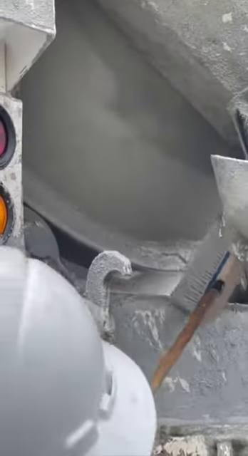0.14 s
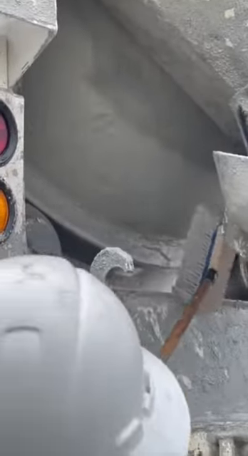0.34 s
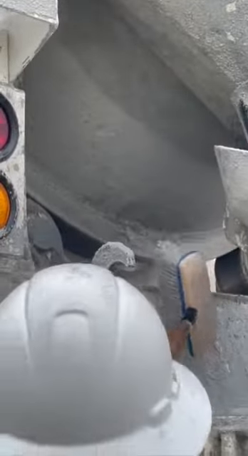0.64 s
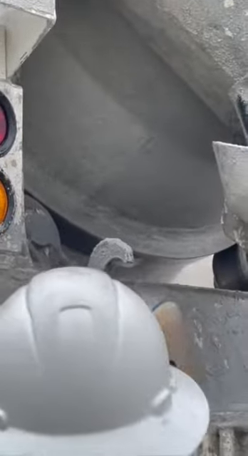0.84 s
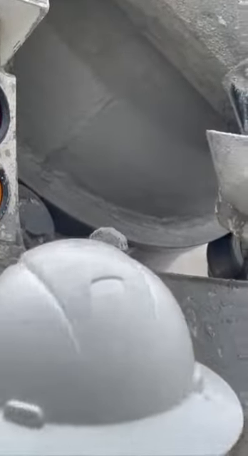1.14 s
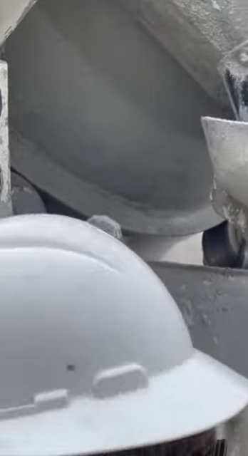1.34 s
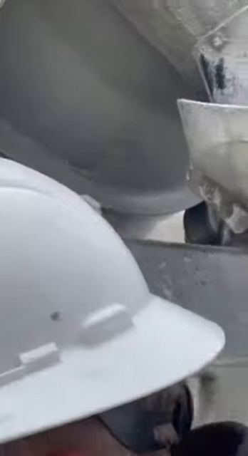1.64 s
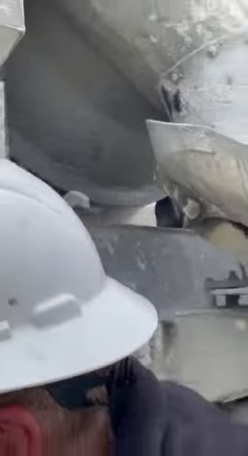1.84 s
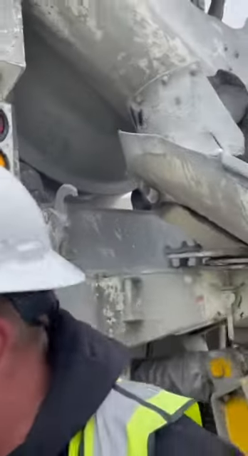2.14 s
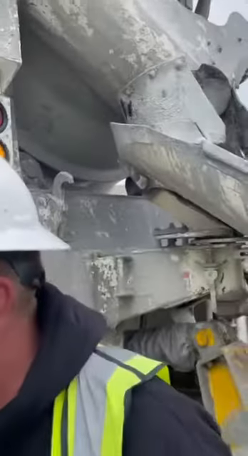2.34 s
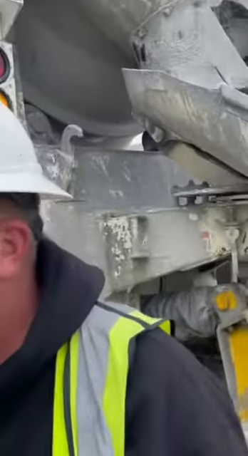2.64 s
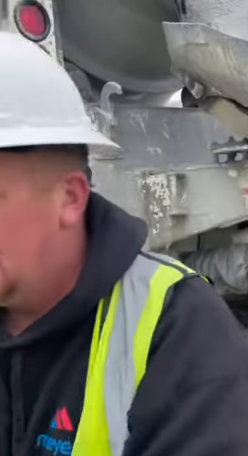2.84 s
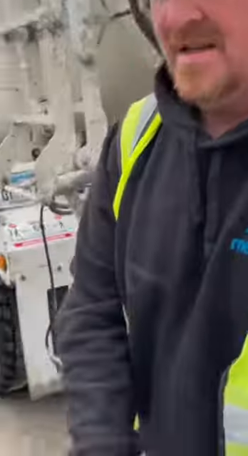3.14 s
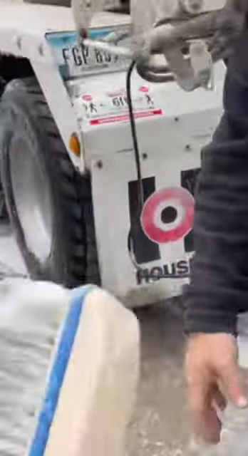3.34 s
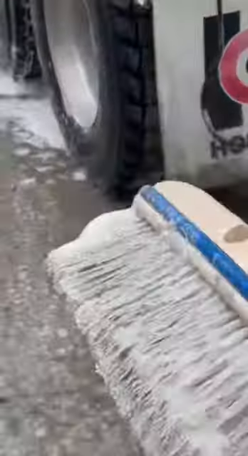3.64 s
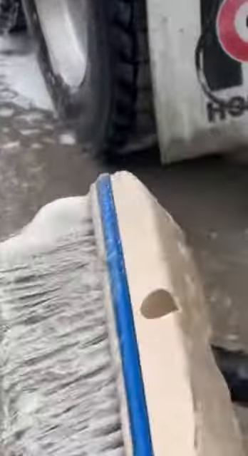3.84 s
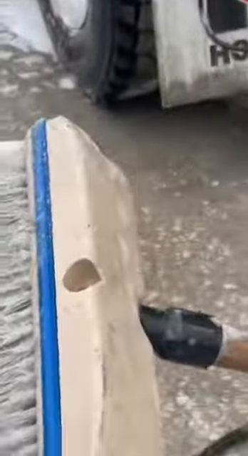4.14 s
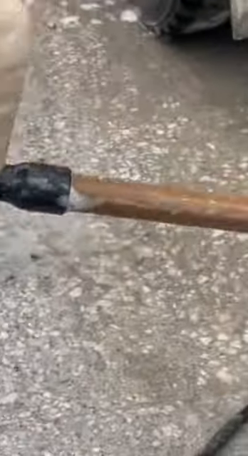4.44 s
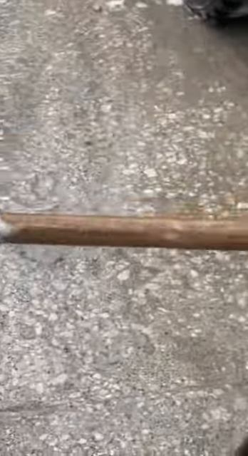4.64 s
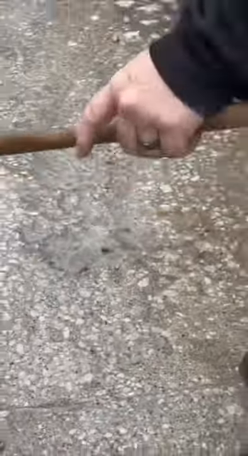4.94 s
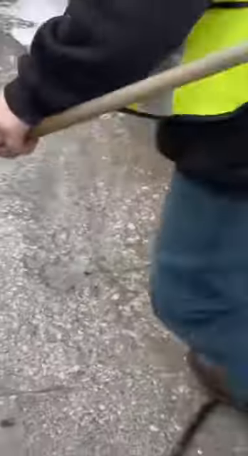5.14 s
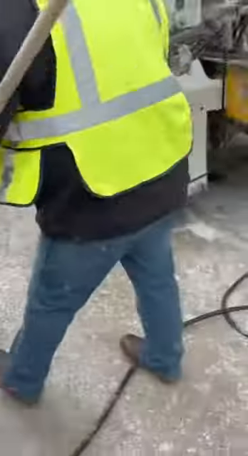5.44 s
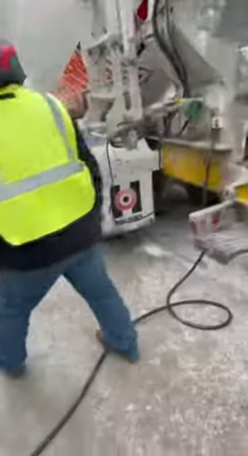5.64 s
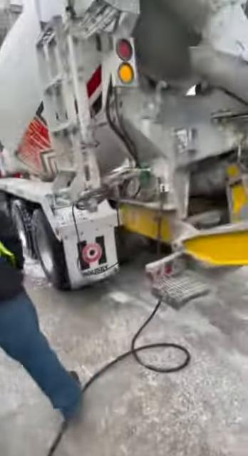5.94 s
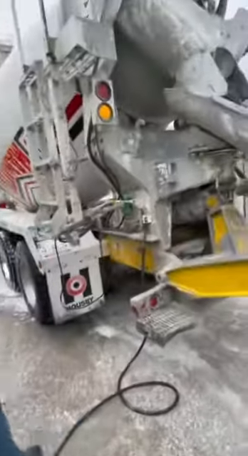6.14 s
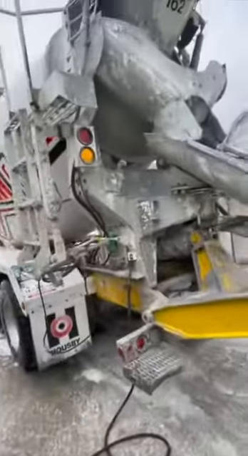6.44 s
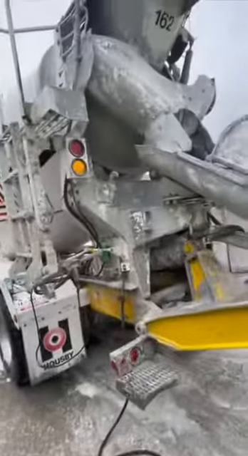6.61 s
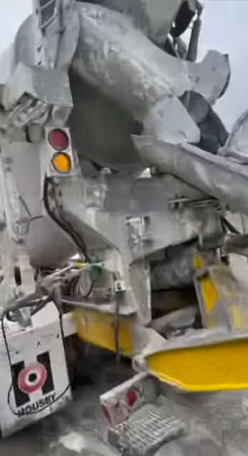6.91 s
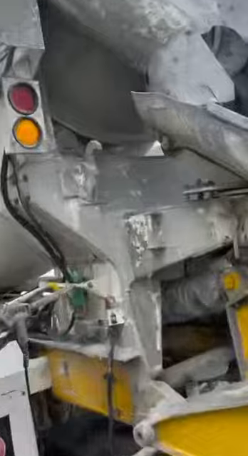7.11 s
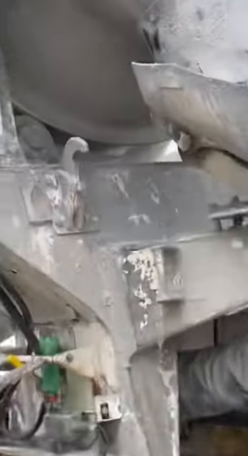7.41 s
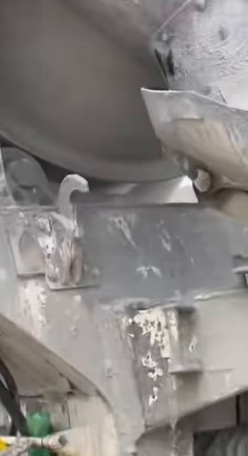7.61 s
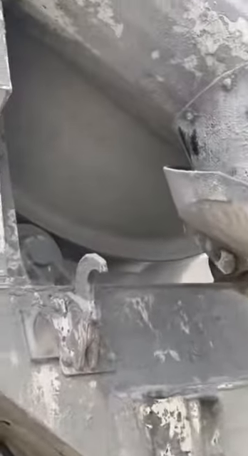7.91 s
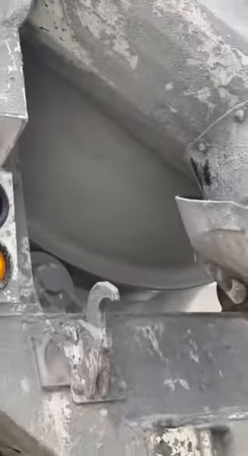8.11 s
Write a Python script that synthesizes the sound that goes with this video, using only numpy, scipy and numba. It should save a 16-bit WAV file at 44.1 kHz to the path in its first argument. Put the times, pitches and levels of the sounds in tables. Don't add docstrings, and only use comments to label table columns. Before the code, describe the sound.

Continuous deep diesel idling fills the scene, throbbing unevenly under tumbling drum thuds, wavering mid-pitched hydraulic whine and broad fan-like rush. Early on, a broom handle knocks dully; later, short gritty footsteps drag close to the handheld phone, with sharp stone clicks. Past the middle the stereo image opens wider, one exhaust briefly weakens, and hard scrapes return near the end.

```python
import sys
import numpy as np
from scipy import signal
from scipy.fft import rfft, irfft, next_fast_len
from scipy.io import wavfile
from scipy.ndimage import uniform_filter1d
from numba import njit

SR = 44100
rng = np.random.default_rng(int(sys.argv[2]) if len(sys.argv) > 2 else 0)


def int16_out(signal):
    q = np.round(np.clip(np.atleast_2d(signal).T, -1, 1) * 32767)
    wavfile.write(sys.argv[1], SR, q.astype(np.int16))


def linear_from_db(decibels):
    return 10 ** (np.asarray(decibels, float) / 20)


N = 364707
T = np.arange(N) / SR


@njit
def svf(x, hz, width):
    y, b, l = np.empty(len(x)), 0., 0.
    g, k = np.tan(np.pi * hz / SR), width / hz
    for i in range(len(x)):
        v = (b + g * (x[i] - l)) / (1 + g * (g + k))
        b, l, y[i] = 2 * v - b, l + 2 * g * v, k * v
    return y


def unit(x):
    return x / np.sqrt(np.mean(x ** 2))


def curves(table):
    s, *columns = np.transpose(table)
    return [np.interp(T, s, c) for c in columns]


def walk(rate_hz):
    step = 32
    hold = int(SR / rate_hz / step)
    levels = np.repeat(rng.standard_normal(N // step // hold + 2), hold)
    coarse = uniform_filter1d(uniform_filter1d(levels, hold), hold)
    return 1.29 * np.interp(np.arange(N) / step, np.arange(len(coarse)), coarse)


def tone(turns, db, hz, pan_db):
    spread = min(.12 + hz / 800, 1)
    ear = np.array([[1], [-1]])
    lean_db = np.exp(-np.log2(hz / 520) ** 2 / 0.64) * pan_db / 2 + spread * 1.1 * walk(1.96)
    phase = 2 * np.pi * turns + ear * spread * 0.12 * walk(1.3)
    return np.sqrt(2) * linear_from_db(db + ear * lean_db) * np.cos(phase)


def orders(turns, hz, table, pan_db, fade_db, rate_hz):
    return sum(tone(k * turns + rng.random(), db + fade_db * walk(rate_hz), k * hz, pan_db)
               for k, db in table)


def swells(table, which, steady_db):
    total = linear_from_db(steady_db)
    for s, length_s, line, db in table:
        if abs(line / which - 1) < .08:
            total = total + linear_from_db(db) * np.cos(np.pi * np.clip((T - s) / length_s, -.5, .5)) ** 2
    return 20 * np.log10(total + np.zeros(N))


def strong(turns, hz, steady, table, pan_db, flutter_db, rate_hz, slop=0):
    out = 0
    for k, steady_db in steady:
        k = round(k)
        phase = k * turns + rng.random() + slop * k ** 2 * walk(rate_hz)
        db = swells(table, k, steady_db) + flutter_db * np.sqrt(k) * walk(rate_hz)
        out = out + tone(phase, db, k * hz, pan_db)
    return out


TRUCK_HZ, OTHER_HZ, BEAT_S = 34.98, 32.945, .074
# (time [s], truck 2nd order [dB], other 2nd order [dB])
EXHAUST = [(0, -27, -30.5), (.75, -27.5, -31), (1.35, -27.5, -29), (1.7, -25.5, -29), (2.7, -27, -29.5),
           (3.2, -24.5, -27.5), (4.3, -25, -26), (5.8, -25, -28), (6.3, -28, -30), (6.75, -29, -38),
           (7.3, -27.5, -35), (8.27, -26.5, -30)]
# (firing multiple [1], level [dB])
TRUCK_ORDERS = [(1, -40), (4, -46.5), (6, -52), (10, -51.5)]
# (firing multiple [1], level [dB])
OTHER_ORDERS = [(1.5, -46), (3, -40), (3.5, -43), (4, -43), (4.5, -44), (6, -55.5), (6.5, -51.5), (11, -43),
                (12, -54.5), (12.5, -47.5), (13.5, -58), (14, -55.5), (22, -57)]
# (firing multiple [1], level [dB])
TRUCK_STEADY = [(3, -42.5), (5, -42.5)]
# (time [s], length [s], firing multiple [1], level [dB])
TRUCK_SWELLS = [(2.64, 1.2, 3, -40), (3.36, 1.06, 5, -36), (3.44, 2.6, 3, -40), (5.12, 2.4, 3, -37),
                (5.475, 2.8, 5, -36.5), (6.96, 1, 5, -41)]


def exhausts(hunt_s, pan_db):
    truck, other = TRUCK_HZ * (T - BEAT_S), OTHER_HZ * (T - BEAT_S)
    truck_db, other_db = curves(EXHAUST)
    out = tone(2 * truck, truck_db, 70, pan_db) + tone(2 * other, other_db, 66, pan_db)
    out += strong(truck, TRUCK_HZ, TRUCK_STEADY, TRUCK_SWELLS, pan_db, 0.87, 4)
    out += orders(truck + TRUCK_HZ * hunt_s, TRUCK_HZ, TRUCK_ORDERS, pan_db, 1.9, 2.59)
    return out + orders(other, OTHER_HZ, OTHER_ORDERS, pan_db, 4.6, 2.996)


# (pitch [Hz], width [Hz])
DRUM_MODES = [(78, 8), (93, 10.7), (124, 23)]
# (time [s], length [s], mode [Hz], level [dB])
LUMPS = [(.7, 1.4, 78, -33), (1.9, 1.4, 78, -34.5), (0.16, 0.56, 93, -27), (0.24, 0.18, 124, -30),
         (0.52, 0.48, 93, -18.5), (0.96, 0.64, 93, -25.6), (1.32, 0.33, 93, -30), (1.8, 0.69, 93, -33),
         (2.12, 0.28, 93, -25), (2.2, 0.45, 124, -44), (2.28, 0.3, 93, -34), (2.4, 0.17, 124, -23.5),
         (2.76, 0.47, 124, -26.5), (2.88, 0.22, 93, -29.5), (3.16, 0.18, 93, -31), (3.6, 0.17, 124, -26.5),
         (4.28, 0.15, 93, -31.9), (4.44, 0.13, 124, -30.5), (6.48, 0.27, 124, -35), (6.52, 0.22, 93, -25),
         (6.68, 0.43, 124, -27), (6.84, 0.22, 93, -30), (7.04, 0.21, 93, -24), (7.24, 0.19, 93, -24),
         (7.48, 0.18, 93, -29), (7.64, 0.39, 124, -33), (7.72, 0.2, 93, -33), (8.04, 0.3, 93, -28.5)]


def drum():
    out = 0
    for hz, width_hz in DRUM_MODES:
        shake = np.sqrt(2) * np.cos(2 * np.pi * (hz * T + .12 * walk(width_hz)))
        out = out + linear_from_db(swells(LUMPS, hz, -36) + 1.5 * walk(20)) * shake
    return out


PUMP_HZ, GEAR_HZ, FAN_HZ = 126.17, 173.0, 4877
# (order [1], level [dB])
PUMP_ORDERS = [(1, -38.5), (10, -54), (11, -55), (12, -62)]
# (order [1], level [dB])
PUMP_STEADY = [(2, -41), (3, -47.5), (4, -49.5), (5, -49.5), (6, -48.5), (7, -62), (8, -55.5), (9, -56)]
# (time [s], length [s], order [1], level [dB])
PUMP_SWELLS = [(0.358, 2, 5, -45.5), (.4, 0.52, 2, -31.5), (.7, 2.75, 6, -39), (2.04, 1.8, 6, -41),
               (2.7, 1.1, 4, -53), (3, 1.11, 2, -34.5), (3.003, 0.91, 6, -44.5), (3.196, 1.7, 3, -45),
               (3.68, 0.83, 6, -42.5), (3.836, 2.1, 5, -47.5), (4.036, .43, 3, -36), (4.044, 2.3, 3, -38.5),
               (4.498, 1.75, 6, -44.5), (4.8, 1.6, 5, -52), (5.157, 1.6, 3, -42.5), (5.4, 0.97, 6, -38.5),
               (5.394, 1.98, 2, -32), (5.717, 0.47, 5, -43), (5.85, 1.9, 4, -44), (6.164, 0.28, 6, -41),
               (6.162, 2.16, 3, -38.5), (6.32, 1.25, 2, -36), (6.96, 0.89, 2, -29.5), (7, 0.69, 5, -40),
               (7.045, 0.45, 3, -42.5), (7.107, 1.85, 6, -38.5), (7.6, 0.28, 3, -41),
               (7.957, 1.6, 2, -36.5), (7.96, 2, 3, -37.5), (8, 0.91, 6, -55),
               (2.2, .7, 7, -56), (3.5, 1.1, 7, -46.5), (4.2, 1.2, 7, -50), (5.95, 1.3, 7, -47.5),
                    (7.1, 1, 7, -54), (1, .5, 8, -51), (3, 1.6, 8, -53), (4.7, 1.2, 8, -50),
                    (5.7, .9, 8, -43.5), (7.5, 2, 8, -47), (.9, 1.9, 9, -48.5), (2.3, 0.78, 9, -54),
                    (3.9, 2.2, 9, -50), (5, 1, 9, -52), (6, 1, 9, -46), (7.7, 2.2, 9, -48)]
# (order [1], level [dB])
GEAR_ORDERS = [(2, -48), (3, -49.5), (4, -64.5), (8, -61.5)]
# (order [1], level [dB])
GEAR_FAINT = [(20, -64), (20.5, -64), (30, -68)]
# (order [1], level [dB])
GEAR_STEADY = [(6, -48), (12, -59.5)]
# (time [s], length [s], order [1], level [dB])
GEAR_SWELLS = [(.5, .5, 6, -44.5), (.4, .9, 12, -52), (1.08, .4, 6, -43), (1.05, 1.0, 12, -49),
               (2.05, 1.0, 6, -47), (1.95, .5, 12, -55), (3.13, .6, 12, -48.5), (3.6, 1.2, 6, -43),
               (4.5, 2.1, 6, -39.5), (5.452, 0.74, 6, -41), (5.2, .6, 12, -60), (6.3, .45, 12, -52),
               (6.8, 0.97, 12, -56), (7.6, 1.1, 6, -43.5), (8.1, .8, 6, -46), (8.1, .6, 12, -57)]
# (time [s], length [s], order [1], level [dB])
FAN_SWELLS = [(.1, .3, 1, -63), (.5, .4, 1, -60.5), (.95, .5, 1, -61), (1.4, .6, 1, -57.5),
              (1.75, .5, 1, -60.5), (2.58, .5, 1, -57.5)]


def whines(hunt_s, pan_db):
    pump, gear = PUMP_HZ * (T + hunt_s), GEAR_HZ * (T + hunt_s)
    out = orders(pump, PUMP_HZ, PUMP_ORDERS, pan_db, 3.3, 3.8)
    out += orders(gear, GEAR_HZ, GEAR_ORDERS, pan_db, 3.2, 3.5)
    out += orders(gear, GEAR_HZ, GEAR_FAINT, 0, 4, 3)
    out += strong(pump, PUMP_HZ, PUMP_STEADY, PUMP_SWELLS, pan_db, .45, 12)
    out += strong(gear, GEAR_HZ, GEAR_STEADY, GEAR_SWELLS, pan_db, .65, 16, slop=.0016)
    fan_db = swells(FAN_SWELLS, 1, -74) + 2.6 * walk(16)
    return out + tone(FAN_HZ * T + .17 * walk(30), fan_db, FAN_HZ, 0)


# (time [s], length [s], level [dB], sole [Hz], top [Hz])
SCUFFS = [(1.827, 0.06, -37.5, 1690, 7400), (3.277, .04, -43.5, 2200, 11000),
          (3.613, .045, -36, 4600, 7000), (3.63, 0.055, -32, 2400, 4500), (4.509, 0.089, -48, 2300, 3500),
          (5, 0.059, -45.5, 2800, 4400), (5.543, .03, -42, 2100, 8000), (6.975, 0.038, -41, 2700, 3570),
          (7.4, .032, -42, 2670, 6000), (7.45, 0.095, -42, 2270, 4000), (7.48, 0.053, -46, 2300, 9000),
          (7.563, 0.05, -39.5, 4260, 6000), (7.596, 0.063, -40, 4200, 6700),
          (7.618, 0.081, -33.5, 2710, 7000), (8.251, 0.095, -32, 1950, 6540), (2.736, .19, -45, 1650, 2000),
          (2.93, .19, -47, 1800, 2200), (3.13, .19, -45, 1700, 2100), (3.329, 0.18, -46, 1640, 2000),
          (4.55, .06, -52, 2400, 3000)]
# (time [s], length [s], level [dB], sole [Hz])
BRUSHES = [(0.185, .038, -56.5, 8000), (1.108, 0.022, -49, 5500), (1.194, 0.024, -44, 4300),
           (2.146, 0.027, -54, 9000), (2.294, 0.078, -55.5, 8600), (3.576, 0.037, -38.5, 3720),
           (4.15, 0.052, -56, 7000), (4.219, 0.082, -45, 7940), (4.898, .022, -42, 5200),
           (6.553, .053, -48, 5760), (6.703, .04, -46.5, 3200), (6.972, 0.06, -41.5, 5430),
           (7.263, 0.029, -56.5, 7960)]
BRUSH_TOP_HZ, GRIT_BELOW_SOLE = 11500, .66


def drag(length_s, sole_hz, top_hz):
    count = int(1.3 * length_s * SR)
    u = np.arange(count) / (1.3 * length_s * SR)
    noise, grit, slip, luck = rng.standard_normal((4, SR // 4))
    noise = noise * (1 + 4 * (luck > 2.7))
    rough_db = 2.0 * np.repeat(grit, 55)[:SR // 4] + 1.4 * np.repeat(slip, 250)[:SR // 4]
    grains = (noise * linear_from_db(rough_db))[:count]
    edges_hz = [GRIT_BELOW_SOLE * sole_hz, max(top_hz, 1.2 * sole_hz)]
    hiss = signal.sosfilt(signal.butter(2, edges_hz, "band", fs=SR, output="sos"), grains)
    for multiple, gain in [(1, 1.6), (1.4, .8), (2.0, .6)]:
        hz = min(multiple * sole_hz, 15000.)
        hiss = hiss + gain * svf(svf(grains, hz, .42 * hz), hz, .42 * hz)
    return unit(hiss) * 2.07 * u ** 0.69 * (1 - u) ** 1.58 * 2.21


# (time [s], peak [dB], pitch [Hz], t60 [s])
TICKS = [(3.177, -31, 11400, 0.0037), (3.272, -28, 5000, 0.0066), (4.348, -25.5, 2820, 0.019),
         (4.348, -31.5, 4400, 0.011), (4.349, -29.5, 5440, .012), (1.8487, -26, 3100, 0.016),
         (3.582, -27.5, 3300, .008), (6.981, -31.5, 2900, 0.018), (5.655, -41, 10000, 0.0034),
         (5.951, -37, 9500, 0.0044), (6.104, -31, 2800, .017), (6.540, -35, 10000, 0.005),
         (7.564, -21, 2900, .005), (1.854, -27.5, 2100, 0.017), (8.252, -28.5, 1800, 0.023),
         (8.9, -27, 4200, .005), (8.066, -43.5, 12000, 0.0036), (.886, -14, 700, .016),
         (.8965, -17, 560, .02), (.904, -17.5, 740, .028), (3.112, -32.5, 1740, 0.12),
         (4.902, -37, 12700, .004), (6.96, -36, 13000, 0.0036), (1.841, -42, 13000, .004),
         (3.586, -31, 5630, .012), (3.591, -30.5, 3900, 0.013), (3.6265, -26, 4870, .016),
          (3.637, -25, 3100, .012), (3.648, -24, 2080, .02), (3.664, -26, 2200, .016),
          (6.559, -36.5, 5300, .03), (6.578, -35.5, 5680, .03), (6.592, -38.5, 5400, .03),
          (6.98, -29.5, 5140, .025), (6.994, -33, 5600, .025), (7.006, -33, 5900, .025),
          (6.998, -39.5, 10600, .012), (7.5642, -23, 4600, 0.0043), (7.5686, -24, 2400, 0.0066),
          (7.575, -28, 4900, .01), (7.591, -28, 4300, .01), (7.621, -28, 4000, .008),
          (7.6336, -23, 5640, .008), (7.641, -28, 2100, .014), (7.646, -28, 5300, .008),
          (7.6345, -25, 2800, .012), (3.281, -31, 2600, .014), (4.903, -33, 2600, .012),
          (5.552, -31, 2500, .014), (6.575, -35, 2600, .015), (1.204, -36, 2600, .01),
          (7.5685, -21, 5150, .008), (7.5688, -27, 3700, .005), (1.21, -38, 3400, .01),
          (7.656, -27, 3200, .01), (7.665, -24, 4280, .008), (7.677, -27, 5200, 0.011)]


def tick(hz, t60_s):
    u = np.arange(int(t60_s * SR)) / SR
    rough = svf(rng.standard_normal(SR // 8), 1. * hz, 0.51 * hz)[:len(u)]
    ring = np.sin(2 * np.pi * hz * u) + 1.2 * rough
    return ring * np.exp(-np.log(1000) * u / t60_s) * np.minimum(u * hz / 0.53, 1)


def boots():
    out = np.zeros(N + SR)
    for s, length_s, db, sole_hz, top_hz in [*[(*row, BRUSH_TOP_HZ) for row in BRUSHES], *SCUFFS]:
        hiss = drag(length_s, sole_hz, top_hz)
        out[int(s * SR):][:len(hiss)] += linear_from_db(db) * hiss
    for s, db, hz, t60_s in TICKS:
        ring = tick(hz, t60_s)
        out[int(s * SR):][:len(ring)] += linear_from_db(db) * ring
    out = out[:N]
    late = uniform_filter1d(np.roll(out, 37), 7)
    return np.array([out + 0.28 * late, out - 0.47 * late])


# (pitch [Hz], density [dB/Hz], side minus mid [dB])
ROAR = [(25, -21.5, -31), (48.7, -20.5, -24), (73, -4.5, -29), (160, -10.5, -21.5), (300, -17.5, -15.5),
        (619, -21, -11), (1100, -29, -8), (1540, -34, -19.5), (2313, -34.5, -5.5), (4200, -45.5, -11),
        (6000, -45.5, -14), (9000, -57, -45), (12700, -50, -43.5), (16700, -81.5, -35)]
ROAR_DB, WIDE_TOP_HZ = -26.5, 5900
BASS_WIDE, SHADE = 0.72, .15


def roar(roar_db, pan_db, wide_db):
    hz_points, db_points, side_points = np.transpose(ROAR)
    out, clatter = 0, np.cos(2 * np.pi * TRUCK_HZ * T) + .5 * walk(60)
    for hz in 25 * 2 ** np.arange(0, 9.4, 1 / 3):
        mid, side = (svf(svf(rng.standard_normal(N), hz, hz / 3), hz, hz / 3) for _ in range(2))
        db, side_db = (np.interp(np.log(hz), np.log(hz_points), p) for p in (db_points, side_points))
        up = np.clip(np.log2(hz / 200) / 3, 0, 1)
        db = db + up * (roar_db + min(2.0, 4000 / hz) * walk(1.0))
        db = db - SHADE * wide_db * np.clip(np.log2(hz / 2000), 0, 1)
        db = db + 0.71 * walk(6) + 0.51 * up * clatter
        lean_db = np.exp(-np.log2(hz / 600) ** 2 / 0.58) * pan_db / 2
        side_db = side_db + max(up, BASS_WIDE) * wide_db / (1 + (hz / WIDE_TOP_HZ) ** 10)
        ports = mid + linear_from_db(side_db) * np.array([side, -side])
        out = out + linear_from_db(db + np.array([lean_db, -lean_db])) * ports
    return unit(out) * linear_from_db(ROAR_DB)


def shadow(x, wide_db):
    from_db, full_db = 4, 12
    band = svf(x.mean(axis=0), 4600., 320.)
    band = np.clip((wide_db - from_db) / (full_db - from_db), 0, 1) * band
    return x - np.array([0 * band, 2 * band])


# (time [s], roar [dB], left minus right [dB], extra side [dB])
AIM = [(0, 0, -0.5, -4), (.9, -0.5, -2, -3), (2.1, -1, -2.5, 3), (3.35, -1, -1.5, 2), (3.9, 0, -2, -2),
       (5.5, -1.5, -4.5, -3), (5.65, -.5, -5, 8.5), (6.3, -1, -4, 9), (6.95, -1, -8, 11),
       (7.3, -0.5, -6, 1), (8.27, -0.5, -5.5, -.5)]


def scene():
    roar_db, pan_db, wide_db = curves(AIM)
    hunt_s = .00025 * np.sin(2 * np.pi * 1.28 * (T - 4.5))
    yard = exhausts(hunt_s, pan_db) + drum() + whines(hunt_s, pan_db)
    yard += boots() + roar(roar_db, pan_db, wide_db)
    return shadow(yard, wide_db)


# (pitch [Hz], side under mid [dB], mid under side [dB], bin under its band [dB])
DROPOUT = [(104, -33, -30, -35), (990, -22.5, -30, -24), (2000, -13, -20, -21.5), (4000, -14, -10, -12),
           (5200, -3.5, -10, -8), (6300, 0, -4, -3), (7000, 2.5, -4.5, 2), (9000, -3.5, -5.5, -5.5),
           (12000, -2, -1.5, 0), (13200, -3, 2.5, 1), (15500, -9, 0, -1)]
SHARP_S = [3.28, 4.9, 6.96, 8.25]


def starve(x):
    frame = dict(window="cosine", nperseg=2048, noverlap=1024)
    lead = 84
    pair = np.pad([x[0] + x[1], x[0] - x[1]], ((0, 0), (lead, 0))) / 2
    pair = signal.stft(pair, **frame)[2]
    edges = np.arange(0, 1025, 12)
    spread = lambda band: np.repeat(band, np.diff(np.r_[edges, 1025]), axis=-2)
    power = np.add.reduceat(abs(pair) ** 2 + 1e-30, edges, axis=1) / 12
    shape = power[0].shape
    ratio_db = 10 * np.log10(power[1] / power[0])
    ratio_db = ratio_db + 1.1 * rng.standard_normal(shape) + 1.7 * rng.standard_normal(shape[1])
    hz, *limits = np.transpose(DROPOUT)
    centre = edges + 6
    side_db, mid_db, bin_db = (np.interp(np.log(centre), np.log(hz * 2048 / SR), db)[:, None]
                               for db in limits)
    keep = spread(np.array([-ratio_db > mid_db, ratio_db > side_db]))
    keep = keep * (abs(pair) ** 2 > spread(power * linear_from_db(2 * bin_db)))
    from_hz, all_hz = 13400, 18000
    share = (centre * SR / 2048 - from_hz) / (all_hz - from_hz)
    keep = keep * spread(rng.random(shape) > share[:, None])
    sharp = np.round((np.array(SHARP_S) * SR + lead) / 1024).astype(int)
    keep[:, 250:620, sharp] = 1
    leak = np.roll(pair[::-1, 250:620, sharp], 5, axis=1)
    pair[:, 250:620, sharp] += linear_from_db(-14) * leak
    mid, side = signal.istft(pair * keep, **frame)[1]
    return np.array([mid + side, mid - side])[:, lead:lead + N]


def top_cut(x):
    return signal.sosfilt(signal.butter(12, 15600, fs=SR, output="sos"), x)


def record(dry):
    from_hz, turn_hz = 4400, 6700
    size = next_fast_len(N)
    hz = np.arange(size // 2 + 1) * SR / size
    turn = np.exp(-1j * np.pi * np.maximum(hz - from_hz, 0) / turn_hz)
    bass_cut = 1 + (24 / (hz + 1)) ** 6
    ports = irfft(rfft(dry, size) * np.array([turn, turn.conj()]) / bass_cut, size)[:, :N]
    mix = starve(ports)
    return top_cut(mix)


dry = scene()
out = record(dry)
int16_out(out)
```